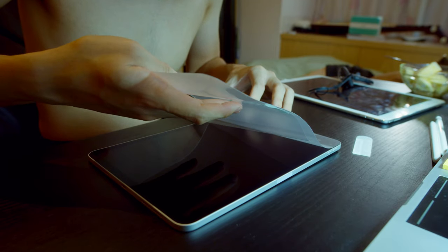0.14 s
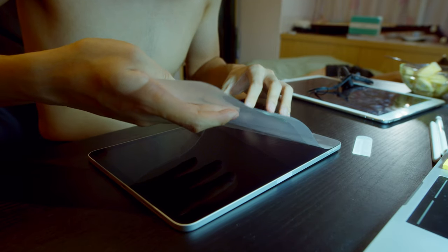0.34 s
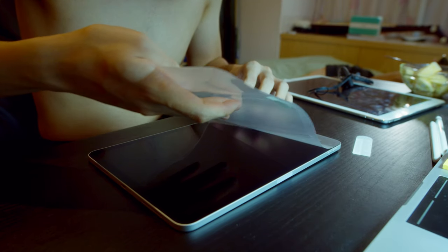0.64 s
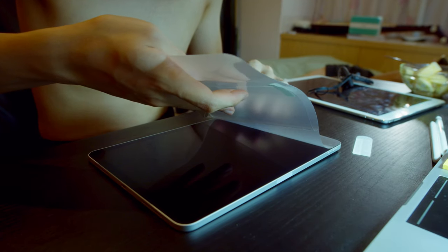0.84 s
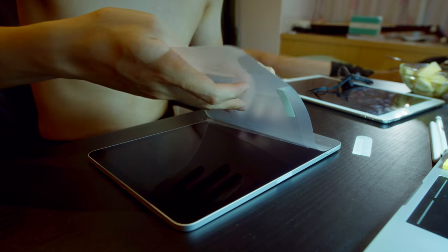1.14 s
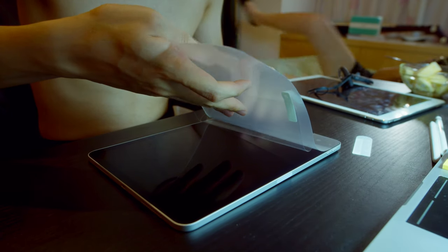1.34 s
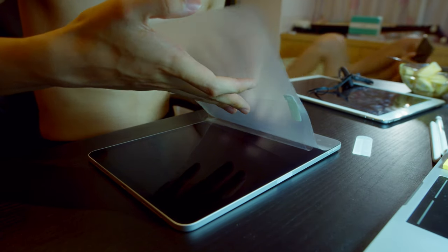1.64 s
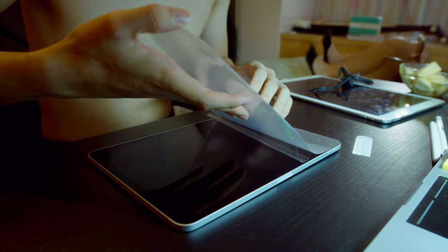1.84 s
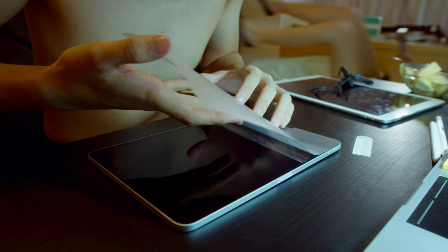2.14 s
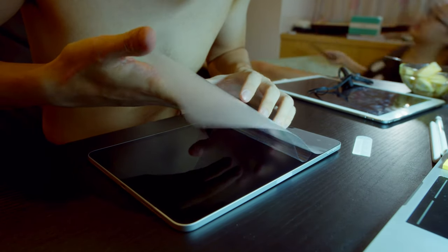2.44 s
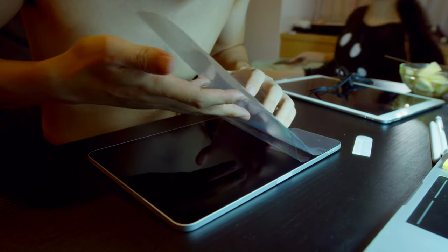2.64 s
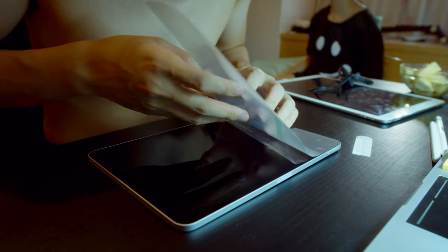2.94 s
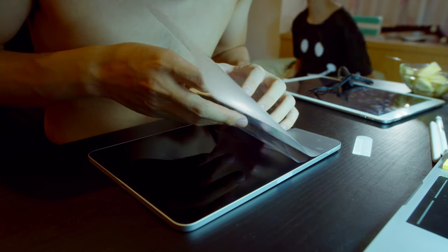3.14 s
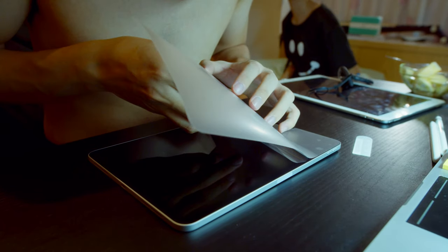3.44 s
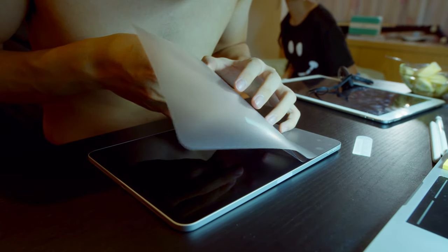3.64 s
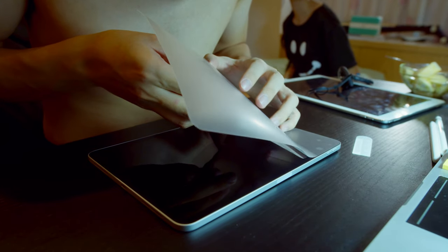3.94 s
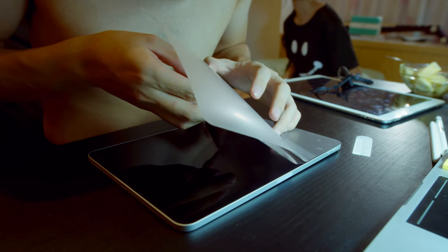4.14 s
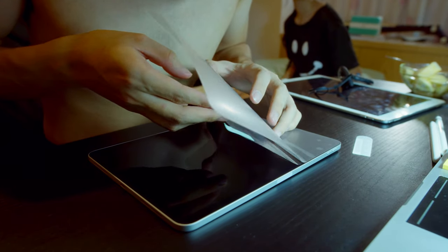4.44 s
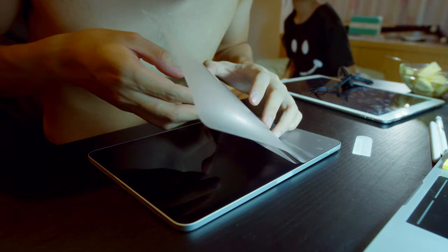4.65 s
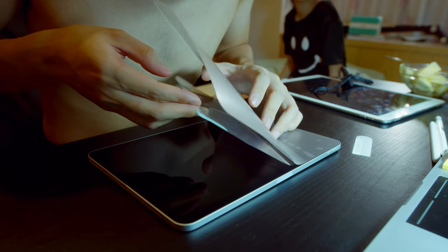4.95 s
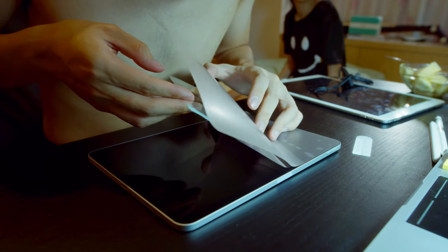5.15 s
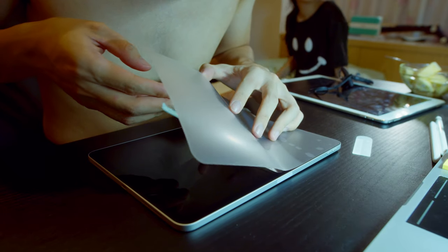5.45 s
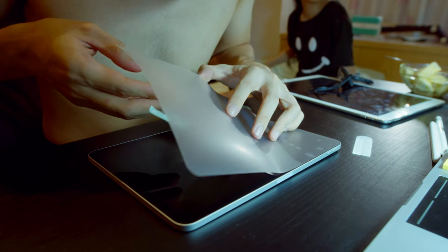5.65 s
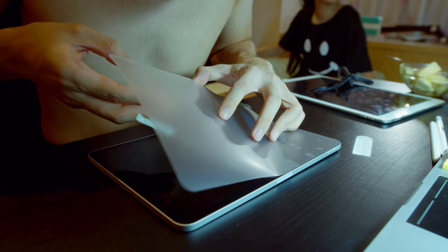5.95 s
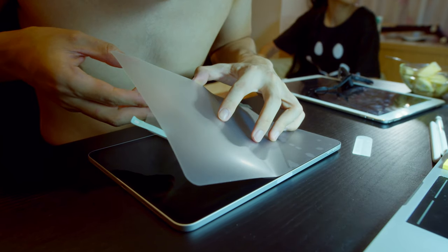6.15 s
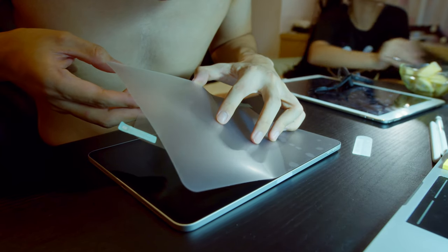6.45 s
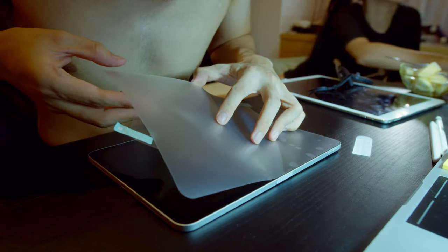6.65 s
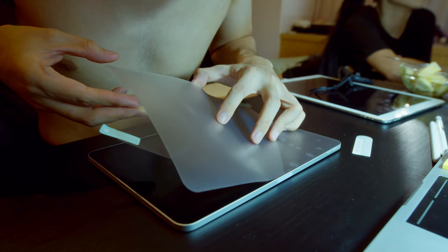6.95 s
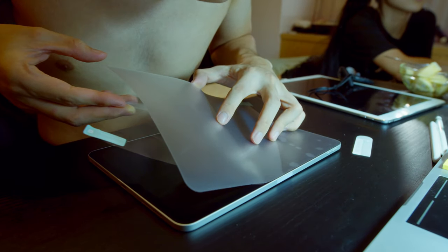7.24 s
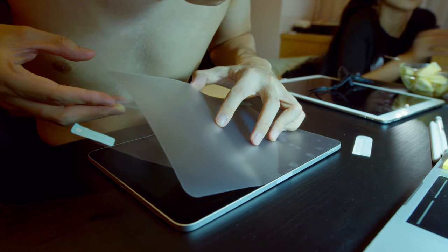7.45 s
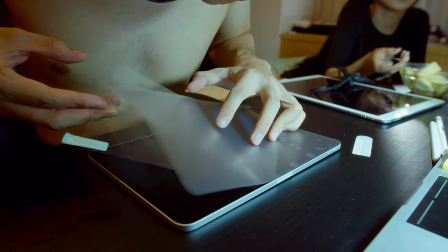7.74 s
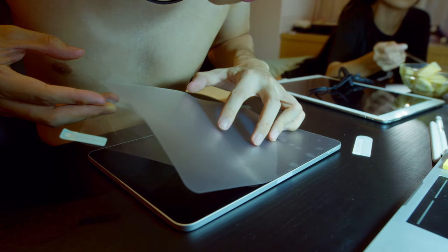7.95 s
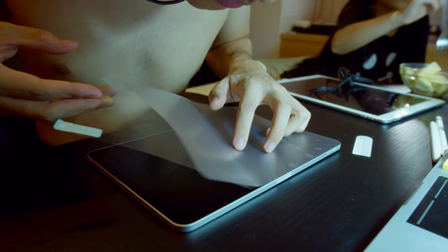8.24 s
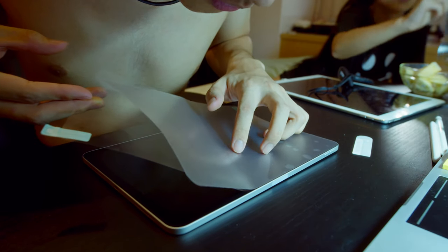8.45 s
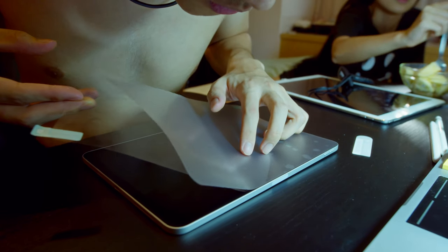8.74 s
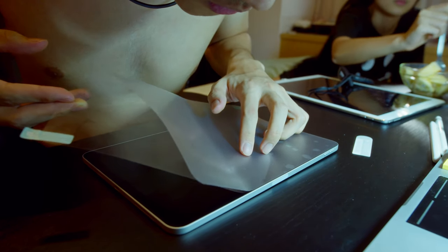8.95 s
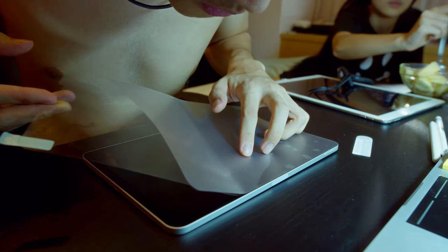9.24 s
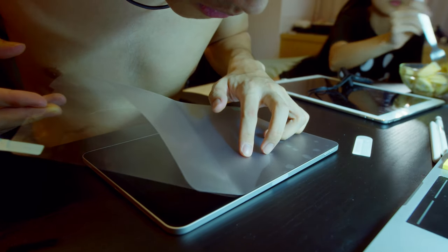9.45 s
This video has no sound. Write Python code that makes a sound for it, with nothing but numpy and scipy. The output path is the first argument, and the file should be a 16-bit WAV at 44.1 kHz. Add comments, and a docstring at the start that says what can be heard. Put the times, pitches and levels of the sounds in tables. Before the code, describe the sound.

A film sheet is handled over glass at a desk, heard close with short room echoes. Bright hard cracks and dense small ticks come first, then a short creaking fold and more spaced snaps. Fingers rustle and swish on the plastic, hands bump the desk hollowly, and something heavy scrapes briefly. A low appliance hum and soft air noise continue throughout, becoming most exposed at the quiet start.

```python
"""Stiff film peeled over a tablet

A stiff plastic film is peeled and held over a tablet's glass at a desk in a small furnished room.
Ringing cracks make the ticks of the glue and the louder snaps of the buckling sheet; a fold creaks.
Streams of micro-clicks make rustles and swishes under the fingers, narrow noise bands sing briefly.
Hands bump and rub the desk, something heavy is shoved over it, and a short pure blip glides upward.
An appliance hums, a tone beside a narrow noise drone, over soft air noise."""
import sys
import numpy as np
from scipy import signal
from scipy.fft import rfft, irfft, next_fast_len
from scipy.io import wavfile

SR = 44100
rng = np.random.default_rng(int(sys.argv[2]) if len(sys.argv) > 2 else 0)


def master(y):
    """Save y as 16-bit WAV."""
    cut = np.clip(np.atleast_2d(y).T, -1, 1)
    pcm = np.round(cut * 32767)  # scale
    wavfile.write(sys.argv[1], SR, pcm.astype(np.int16))


N = 422919
TIME = np.arange(N) / SR


def amp(db):
    """Gain of a level in dB."""
    return 10 ** (np.asarray(db) / 20)


def decay(t, t60):
    """Exponential fade that loses 60 dB in t60 seconds."""
    return amp(-60 * t / t60)


def rms_one(x):
    """Scale to rms 1."""
    return x / np.sqrt(np.mean(x ** 2) + 1e-20)


def peak_one(x):
    """Scale to peak 1."""
    return x / np.abs(x).max()


def in_time(rows):
    """Columns of a curve, sample by sample."""
    s, *columns = np.transpose(rows)
    return [np.interp(TIME, s, column) for column in columns]


def at_hz(points, hz):
    """Read a spectrum on a log frequency axis."""
    point_hz, values = np.array(points).T
    return np.interp(np.log(hz), np.log(point_hz), values)


def drift(rate_hz):
    """Slow random wander with spread 1: noise through two equal poles, made at 1/40 of the rate."""
    r = np.exp(-80 * np.pi * rate_hz / SR)
    noise = rng.standard_normal(N // 40 + 2002)
    slow = signal.lfilter([1], [1, -2 * r, r * r], noise)[2000:]  # skip the filter's start
    return np.interp(np.arange(N) / 40, np.arange(len(slow)), rms_one(slow))


def resonance(x, hz, width_hz):
    """Two-pole peak with gain 1 on top."""
    r = np.exp(-np.pi * width_hz / SR)
    poles = [1, -2 * r * np.cos(2 * np.pi * hz / SR), r * r]
    return signal.lfilter([(1 - r * r) / 2, 0, (r * r - 1) / 2], poles, x)


def double_resonance(x, hz, width_hz):
    """The same peak twice, for steeper sides."""
    return resonance(resonance(x, hz, width_hz), hz, width_hz)


def band(x, low_hz, high_hz):
    """Butterworth band-pass."""
    edges = [low_hz, min(high_hz, SR / 2.2)]
    return signal.sosfilt(signal.butter(2, edges, "band", fs=SR, output="sos"), x)


def coloured(x, spectrum):
    """Give a flat sound a spectrum; rms 1."""
    size = next_fast_len(N)
    hz = np.maximum(np.fft.rfftfreq(size, 1 / SR), 1)
    return rms_one(irfft(rfft(x, size) * amp(at_hz(spectrum, hz)), size)[:N])


def grains(per_s, spread_db):
    """Uneven micro-clicks of either sign at random moments, as of a sheet sliding on skin."""
    sizes = amp(spread_db * np.minimum(rng.exponential(1, N), 5)) * rng.choice([-1, 1], N)
    return sizes * (rng.random(N) < per_s / SR)


def add(track, s, burst):
    """Mix a burst in at a time."""
    at = int(s * SR)
    track[at:at + len(burst)] += burst[:N - at]


HUM_HZ, HUM_DB = 152.1, -43  # rms level
DRONE_HZ, DRONE_WIDTH_HZ, DRONE_DB = 172.6, 27, -51


def appliance():
    """A steady tone, its level barely wandering, with a narrow drone of noise beside it."""
    level = amp(HUM_DB + 0.097 * drift(1.0))
    hum = np.sqrt(2) * level * np.sin(2 * np.pi * HUM_HZ * TIME)
    drone = rms_one(double_resonance(rng.standard_normal(N), DRONE_HZ, DRONE_WIDTH_HZ))
    return hum + amp(DRONE_DB) * drone


# spectrum shape of the air noise: f/Hz, relative level per Hz/dB
AIR_SPECTRUM = [(15, -69), (48, -74), (64, -12), (96, -16.5), (126, -6), (157, -5), (216, -8), (291, -15),
                (2200, -28.5), (3880, -35.5), (4330, -32.5), (14600, -49.5), (15800, -49)]
AIR_DB = -47.5  # rms level


def air():
    """Broad steady noise, strongest in the bass."""
    return amp(AIR_DB) * coloured(rng.standard_normal(N), AIR_SPECTRUM)


# spectrum shape of hands rubbing the desk: f/Hz, relative level per Hz/dB
RUB_SPECTRUM = [(50, -60), (100, -25), (300, -7), (700, -11.5), (1500, -19), (4000, -42)]


def rubbing(rub_db):
    """Hands on the desk: dull friction noise with a restless level."""
    return amp(rub_db + 1.5 * drift(10)) * coloured(rng.standard_normal(N), RUB_SPECTRUM)


def patchy(x):
    """As the sheet bends, narrow regions of its colour rise and sink independently."""
    patch_db, sharpness = 2.6, 7
    change = 0
    for hz in np.geomspace(700, 12000, num=22):
        change = change + (amp(patch_db * drift(2.5)) - 1) * resonance(x, hz, hz / sharpness)
    return rms_one(x + change)


# how hard the hands work: t/s, level of the sheet's rustle/dB, level of rubbing on the desk/dB
HANDLING_CURVE = [(0, -79, -57.5), (.9, -64.5, -58), (1.3, -50.5, -48.5), (1.8, -61, -56),
                  (2.45, -49.5, -45), (2.7, -48, -57.5), (3.7, -46.5, -58), (3.88, -64, -57.5),
                  (4.2, -53.5, -48.5), (4.5, -75, -56), (5.0, -58.5, -58), (5.4, -51.5, -51.5),
                  (6.0, -49.5, -51.5), (6.15, -62, -56.5), (7.4, -62.5, -54.5), (7.8, -57.5, -49),
                  (8.5, -66, -52), (9.59, -79, -110)]
# spectrum shape of the sliding sheet: f/Hz, relative level per Hz/dB
RUSTLE_SPECTRUM = [(500, 4.5), (1200, 0.5), (2300, 0.5), (3300, -1.5), (4100, -2), (4900, -3.5),
                   (6000, -5.5), (8000, -7.5), (9500, -18), (15000, -17.5)]


def handling():
    """Sheet rustle with faint stray ticks, swishes and whistles, and hands rubbing the desk."""
    rustle_db, rub_db = in_time(HANDLING_CURVE)
    sliding = coloured(grains(7000, 2.4), RUSTLE_SPECTRUM)
    friction = amp(2.5 * drift(20)) * patchy(sliding)
    tick_shape = rng.standard_normal(256) * decay(TIME[:256], 0.004)
    stray = signal.fftconvolve(grains(45, 3.5), tick_shape)[:N]
    ticks = 0.5 * rms_one(band(stray, 2500, 15000))
    rustle = amp(rustle_db) * (friction + ticks)
    swish_source = amp(1.6 * drift(64)) * sliding + ticks / 2
    return rustle + swishes(swish_source) + whistles() + rubbing(rub_db)


# bumps on desk and tablet: t/s, peak level/dB, ring f/Hz, t60 of the driving noise/s
BUMPS_TABLE = [(.683, -35, 880, 0.092), (1.668, -13, 680, 0.013), (2.3, -26, 146, 0.44),
               (2.57, -29.5, 115, .25), (2.51, -29.5, 624, 0.45), (2.933, -29.5, 373, 0.44),
               (3.017, -30, 640, 0.18), (3.455, -16, 784, 0.061), (3.456, -27, 196, 0.16),
               (3.584, -27, 1260, 0.046), (3.916, -29, 1060, 0.2), (4.342, -32.5, 750, 0.036),
               (4.796, -36, 830, 0.13), (4.866, -22, 1310, 0.077), (6.962, -30, 136, 0.24),
               (7.1065, -14, 437, 0.085), (8.09, -23.5, 1240, 0.19), (8.555, -19.5, 238, 0.14),
               (8.56, -34, 60, .2), (8.945, -25, 275, 0.08), (9.179, -32, 256, 0.076)]


def bumps(ring_q=6.3, broad_share=0.88, push=1.55):
    """A soft contact: a push and dying noise in one hollow resonance over a broad thud."""
    out, t = np.zeros(N), np.arange(8192) / SR
    rows = BUMPS_TABLE + creak()[1]
    for (s, db, hz, t60), noise in zip(rows, rng.standard_normal((len(rows), len(t)))):
        quarter_cycle = t < .25 / hz
        contact = noise * decay(t, max(t60, .005)) + push * quarter_cycle
        hollow = resonance(resonance(contact, hz, hz / ring_q), hz, 2 * hz / ring_q)
        thud = broad_share * band(contact, hz / 2.04, 1.6 * hz)
        add(out, s, amp(db) * peak_one(hollow + thud))
    return out


# how long the diffuse tail lasts in each region: f/Hz, t60/s
ROOM_T60 = [(300, 0.16), (1500, 0.23), (4000, 0.22), (10000, 0.18)]


def room(x, early_db=15.0, early_t60=0.015, first_s=0.00054):
    """Strong echoes off desk and screen, then a diffuse tail dying faster in the top treble."""
    t = np.arange(SR // 2) / SR
    edges = 150 * 2 ** np.arange(0, 7, .5)  # half octaves
    noise = rng.standard_normal((2, len(t)))
    tail = 0
    for k, (low, high) in enumerate(zip(edges, edges[1:])):
        t60 = at_hz(ROOM_T60, np.sqrt(low * high))
        level = decay(t, t60) + amp(early_db) * decay(t, early_t60)
        tail = tail + band(noise[k % 2], low, high) * level
    tail = tail * np.clip(t / first_s, 0, 1) ** 2 / 10
    return signal.fftconvolve(x, tail)[:N]


# swishes of the sheet past fingers and glass: t/s of the crest, level/dB, swell/s, centre f/Hz
SWISHES_TABLE = [(0.684, -43, 0.009, 3300), (.85, -54.5, 0.026, 5900), (1.1, -49.5, 0.067, 4840),
                 (1.13, -42.5, 0.019, 1200), (1.329, -39, 0.007, 1260), (1.43, -53, 0.043, 6440),
                 (1.644, -47.5, 0.027, 3950), (1.92, -49.5, 0.13, 4800), (2.04, -41, 0.015, 3460),
                 (2.6, -51, 0.071, 4500), (3.036, -34, 0.018, 2970), (3.574, -31.5, 0.014, 3330),
                 (4.242, -31, 0.0054, 2700), (4.348, -38.5, 0.0075, 1640), (5.13, -48.5, 0.11, 3870),
                 (5.65, -46, 0.067, 3020), (7.29, -46, 0.0094, 3330), (7.67, -37, 0.013, 2200),
                 (7.688, -28, 0.0039, 3500), (7.734, -24.5, 0.017, 1570), (7.873, -30.5, 0.014, 1770),
                 (8.02, -52, 0.058, 5000), (8.26, -46.5, 0.068, 4350), (8.44, -42.5, 0.089, 1110),
                 (8.563, -29.5, 0.017, 4370), (8.956, -37.5, 0.04, 4750), (9.185, -41, 0.026, 4330)]
FADE_PER_SWELL = 1.5


def swishes(friction, spread=2.2):
    """Friction through the sheet's own colour swells and fades, strongest around its centre."""
    out = np.zeros(N)
    for s, db, swell, hz in SWISHES_TABLE:
        fade = FADE_PER_SWELL * swell
        first, last = max(int((s - 3 * swell) * SR), 0), min(int((s + 4 * fade) * SR), N)
        t = TIME[first:last] - s
        sound = rms_one(band(friction[first:last], hz / spread, hz * spread))
        # a bell-shaped rise, then a nearly exponential fade
        fall = np.where(t < 0, (t / swell) ** 2, np.abs(t / fade) ** 0.97)
        out[first:last] += amp(db) * sound * np.exp(-fall)
    return out


# ticks and snaps of the film: t/s, body peak level/dB, ring f/Hz,
# treble level re body peak/dB (before the shared treble lift)
SNAPS_TABLE = [(1.3772, -23, 2390, -9), (1.659, -10.5, 4670, -21), (1.6699, 2.5, 3960, -35),
               (1.726, -21, 3680, -9), (1.782, -11, 3920, -11), (1.8494, -11.5, 4600, -54),
               (1.8886, -17, 4840, -40), (1.924, -17, 4870, -35), (1.959, -17.5, 4430, -33),
               (2.0388, -21, 2230, -12), (2.05, -20, 3520, -12), (2.2218, -18, 4170, -7),
               (2.3633, -25.5, 4260, -14), (2.496, -11, 2770, -31), (2.546, -9, 4300, -12),
               (2.572, -21, 3490, -25), (2.598, -21, 2400, -28), (2.6132, -19.5, 2350, -29),
               (2.6357, -23, 3780, -9), (2.6825, -25, 4200, -2), (2.718, -22, 3870, -14),
               (2.738, -32, 6000, -11), (2.749, -24, 4960, -17), (2.7708, -21, 4600, -18),
               (2.8029, -23.5, 3880, -20), (2.864, -23.5, 4060, -8), (2.8972, -23.5, 6050, -17),
               (2.916, -22, 2010, -27), (2.9527, -21, 3140, -11), (2.9687, -21, 4740, -30),
               (3.01, -22, 4000, -6), (3.017, -13.5, 2720, -35), (3.05, -31, 5500, -4),
               (3.074, -38, 6000, -2), (3.1154, -19, 3560, -10), (3.167, -17.5, 3520, -7),
               (3.2057, -25, 3780, -23), (3.243, -30, 4000, -13), (3.2796, -21.5, 3830, -6),
               (3.321, -22.5, 3000, -13), (3.3535, -22, 3400, -8), (3.3777, -26, 3270, -7),
               (3.413, -20, 2920, -3.5), (3.4569, -13, 1620, -32), (3.4706, -8, 3370, -33),
               (3.5465, -15.5, 2800, -12), (3.567, -25, 2750, 2), (3.6424, -13.5, 3070, -5),
               (3.658, -27, 2840, -6), (3.6955, -19.5, 2980, -6), (3.759, -16.5, 2840, -0.5),
               (3.791, -27.5, 3080, -4), (3.8267, -29.5, 2920, -5), (3.917, -5, 2770, -13.5),
               (3.952, -28, 5000, -10), (3.978, -37, 6000, -8), (4.0262, -13.5, 4160, -8),
               (4.2385, -27, 2930, -20), (4.6383, -33.5, 1480, -32), (4.7943, -16, 1790, -25),
               (4.856, -22, 3070, -9), (4.8655, 4, 3190, -17), (5.2701, -13.5, 3040, -7),
               (5.3438, -12.5, 3160, -11), (5.3955, -18, 3930, 2), (5.4242, -12.5, 3130, -9),
               (5.4925, -13.5, 3160, -15), (5.537, -19.5, 3080, -14), (5.612, -11.5, 2950, -11),
               (5.6458, -25, 1820, -16), (5.6676, -17, 3160, -9), (5.742, -9.5, 3000, -8),
               (5.823, -10.5, 3100, -9.5), (5.947, -12.5, 2910, -11), (6.0204, -17.5, 3040, -8),
               (6.1997, -10.5, 3065, -18), (6.4222, -29.5, 1590, -31), (6.543, -20, 3120, -11),
               (6.596, -8.5, 3170, -10), (6.9578, -22, 1520, -26), (7.056, -20, 1700, -7),
               (7.0763, -11.5, 2770, -5), (7.222, -25.5, 6200, -20), (7.2561, -16.5, 2920, -7),
               (7.364, -39.5, 5000, -1), (7.4195, -39, 5000, -2), (7.4358, -38, 4170, -11),
               (7.451, -26.5, 4870, -20), (7.4706, -12.5, 2960, -2), (7.69, -12, 2600, -30),
               (7.7228, -22, 2500, -20), (7.796, -42, 4970, -17), (7.919, -33, 6500, -21),
               (8.034, -24.5, 4100, -1), (8.091, -1.5, 3200, -11.5), (8.422, -24.5, 2310, -30),
               (8.4701, -25.5, 2610, -31), (8.512, -26.5, 1640, -20), (8.552, -20, 2200, -6),
               (8.827, -19.5, 2130, 3.5), (8.93, -33, 3150, 5), (9.101, -31.5, 4730, -16),
               (9.166, -32, 2800, -3), (9.209, -33, 6000, -8), (9.3466, -26, 4600, -7),
               (9.561, -28, 2580, 2.5)]


def snaps(crack_t60=0.002, treble_t60=0.0037, ring_share=0.47, ring_q=20.5,
          treble_db=2.5, room_db=-12.0, dull_room_db=-0.03):
    """A crack of a few ms rings a patch of sheet at its own pitch; returns direct sound and room feed."""
    direct, feed, t = np.zeros(N), np.zeros(N), np.arange(1024) / SR
    click = (t == 0) * 1.0
    rows = SNAPS_TABLE + creak()[0]
    for (s, db, hz, top_db), (crack, fizz) in zip(rows, rng.standard_normal((len(rows), 2, len(t)))):
        crack = crack * decay(t, crack_t60) + 2 * click
        ring = 3 * resonance(resonance(crack, hz, hz), hz, hz / ring_q)
        body = ring_share * ring + (1 - ring_share) * band(crack, 0.5 * hz, 1.91 * hz)
        top = band(fizz * decay(t, treble_t60), 2500, 24800)
        add(direct, s, amp(db) * (peak_one(body) + amp(top_db + treble_db) * peak_one(top)))
        # the walls hear one broad crack; dull snaps point away from the listener and sound roomier
        broad = peak_one(band(click, 0.5 * hz, 1.607 * hz))
        broad = broad + amp(top_db + 9) * band(click, 5000, 14000)
        add(feed, s, amp(db + room_db + dull_room_db * (top_db + 8.0)) * broad)
    return direct, feed


# narrow bands that sing while the sheet slides: start t/s, length/s, f/Hz, width/Hz, level/dB
WHISTLES_TABLE = [(2.22, .2, 1395, 120, -50.5), (5.028, .22, 4870, 900, -49),
                  (5.046, .19, 3270, 550, -47.5), (7.216, 0.074, 575, 120, -41),
                  (7.93, 0.084, 2400, 60, -54), (8.544, 0.06, 2130, 350, -40)]


def whistles():
    """Noise twice through a narrow resonance, swelling and fading."""
    out = np.zeros(N)
    noises = rng.standard_normal((len(WHISTLES_TABLE), SR // 4))
    for (s, length, hz, width_hz, db), noise in zip(WHISTLES_TABLE, noises):
        tone = rms_one(double_resonance(noise, hz, width_hz))[-int(length * SR):]
        add(out, s, amp(db) * tone * np.sqrt(np.hanning(len(tone))))
    return out


# close ticks of a creaking fold: t/s, peak level/dB
CREAK_TABLE = [(4.107, -40), (4.118, -35), (4.138, -29), (4.148, -34), (4.168, -26.5), (4.178, -30),
               (4.199, -25.5), (4.204, -26), (4.212, -34)]
CREAK_HZ, CREAK_TREBLE_DB = 1600, -16  # as in the snaps
CREAK_THUD_HZ, CREAK_THUD_DB, CREAK_THUD_T60_S = 520, -6.0, .01  # level re the tick


def creak():
    """A fold creaks in close ticks with a low thud each; returns rows for the snaps and the bumps."""
    ticks = [(s, db, CREAK_HZ, CREAK_TREBLE_DB) for s, db in CREAK_TABLE]
    thuds = [(s, db + CREAK_THUD_DB, CREAK_THUD_HZ, CREAK_THUD_T60_S) for s, db in CREAK_TABLE]
    return ticks, thuds


# two swells of one short blip: t/s of the crest, rms level at the crest/dB, time to fall to 1/e/s
BLIP_SWELLS = [(6.349, -32, 0.0096), (6.38, -45, 0.011)]
BLIP_START_S, BLIP_START_HZ, BLIP_END_HZ, BLIP_GLIDE_S = 6.325, 478, 648, 0.027


def blip():
    """A nearly pure tone whose pitch settles upward, in a loud swell and a faint one."""
    remaining = np.exp(-np.maximum(TIME - BLIP_START_S, 0) / BLIP_GLIDE_S)
    hz = BLIP_END_HZ - (BLIP_END_HZ - BLIP_START_HZ) * remaining
    level = sum(amp(db) * np.exp(-((TIME - s) / half_s) ** 2) for s, db, half_s in BLIP_SWELLS)
    return np.sqrt(2) * level * np.sin(2 * np.pi * np.cumsum(hz) / SR)


# jolts of something heavy shoved over the desk: t/s, level/dB, hold/s, t60/s
SHOVE_JOLTS = [(6.952, -23.5, 0.02, 0.39), (6.997, -24.5, 0.042, 0.11), (7.099, -23.5, 0.031, 0.2)]
JOLT_ATTACK_S = 0.0073


def jolts():
    """Each jolt rises fast, holds and dies away; their powers add."""
    power = 0
    for s, db, hold_s, t60 in SHOVE_JOLTS:
        t = np.maximum(TIME - s, 0)
        rise = np.minimum(t / JOLT_ATTACK_S, 1)
        power = power + (amp(db) * decay(np.maximum(t - hold_s, 0), t60) * rise) ** 2
    return np.sqrt(power)


# resonances of the desk top: f/Hz, width/Hz, relative level/dB
DESK_MODES = [(150, 21, 8), (226, 43, 3.5), (344, 150, 0.5), (540, 22, 2.5), (866, 21, -4.5),
              (1200, 34, -7)]


def shove():
    """Stuttering friction shakes the desk top, with a scrape above."""
    noise = rng.standard_normal(N) * amp(2 * drift(33))
    # dividing by the root of the width keeps wide modes from sounding louder
    wood = sum(amp(db) * resonance(noise, hz, width_hz) / np.sqrt(width_hz)
               for hz, width_hz, db in DESK_MODES)
    scrape = 0.21 * rms_one(band(noise, 200, 2700)) + 0.14 * rms_one(band(noise, 1670, 4250))
    return jolts() * rms_one(rms_one(band(wood, 155, 3240)) + scrape)


def scene():
    """Snaps and bumps feed the room; the other sounds are mixed in without it."""
    direct, feed = snaps()
    desk = band(band(bumps(), 55, 14000), 55, 16000)
    echoes = room(feed + amp(-8.5) * desk)
    background = appliance() + air()
    return (direct + desk + echoes + blip() + handling() + shove() + background)[None]


CUTOFF_HZ = 16500  # 70 dB down from here up


def record(dry):
    """The loudest peaks overload; the top is cut."""
    overloaded = np.clip(dry, -.82, .82)
    return signal.sosfilt(signal.cheby2(14, 70, CUTOFF_HZ, fs=SR, output="sos"), overloaded)


dry = scene()
out = record(dry)
master(out)
```